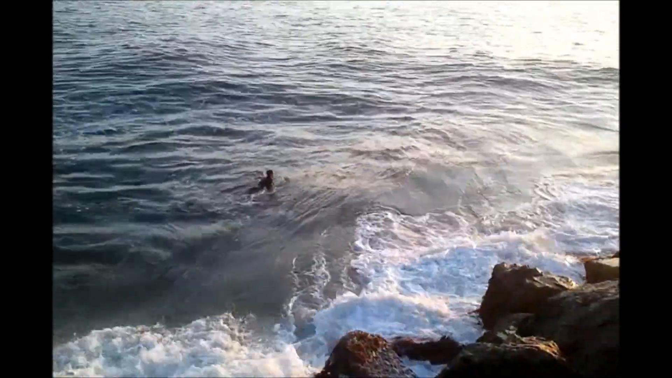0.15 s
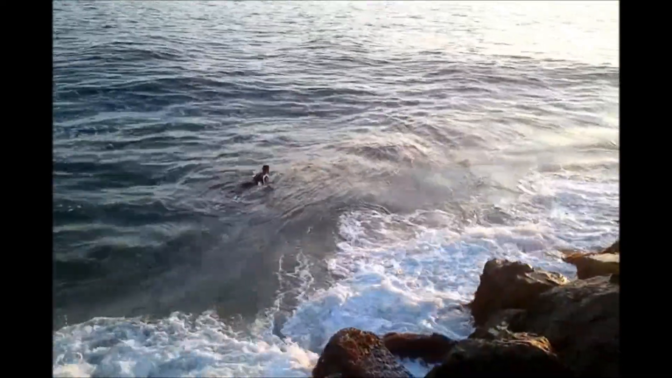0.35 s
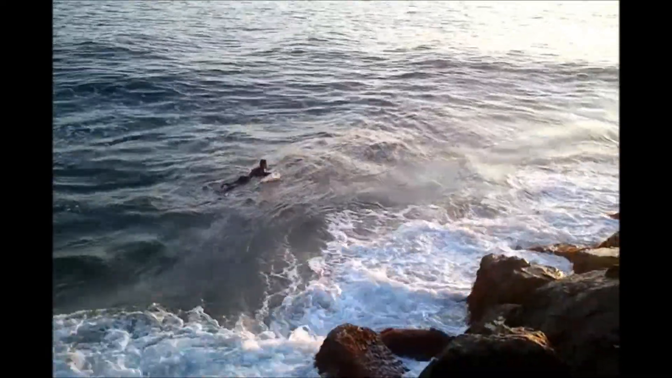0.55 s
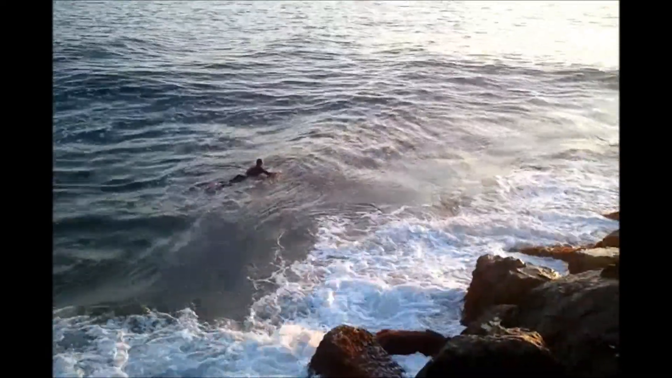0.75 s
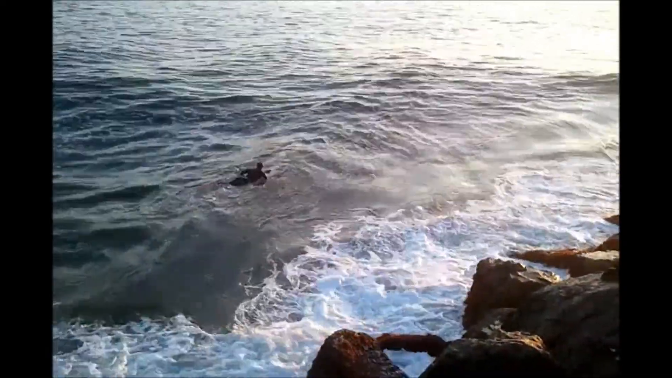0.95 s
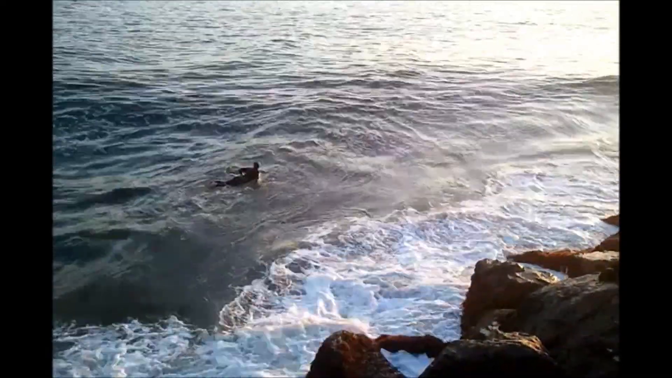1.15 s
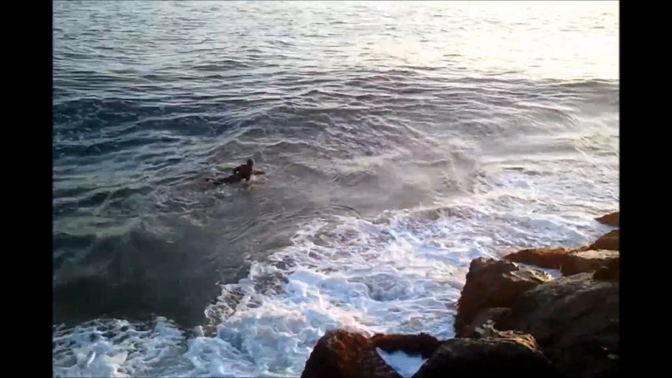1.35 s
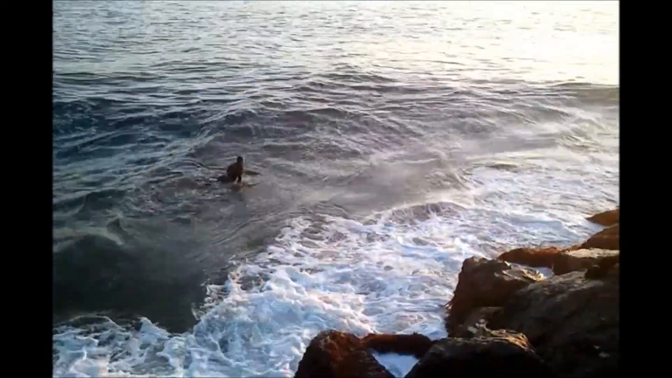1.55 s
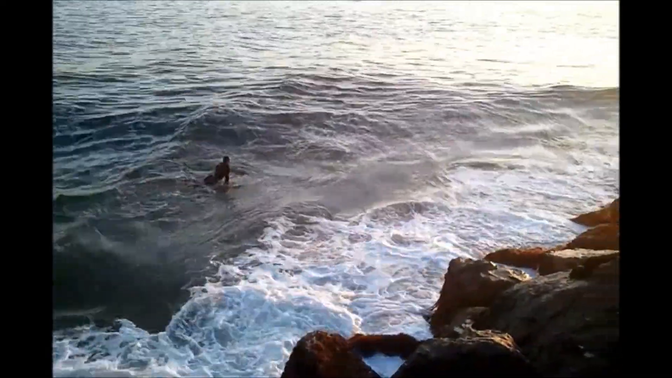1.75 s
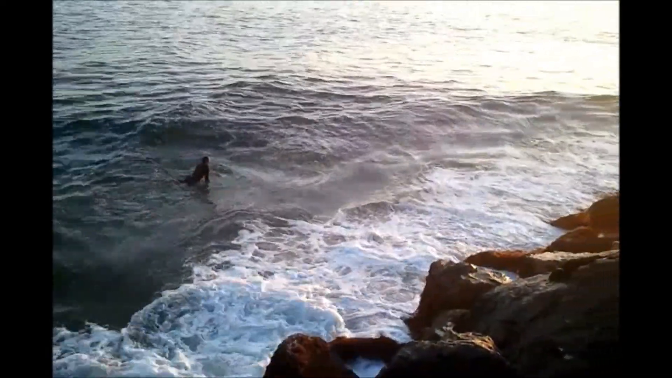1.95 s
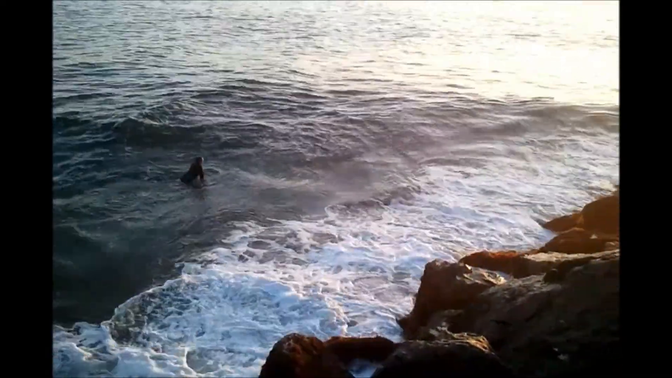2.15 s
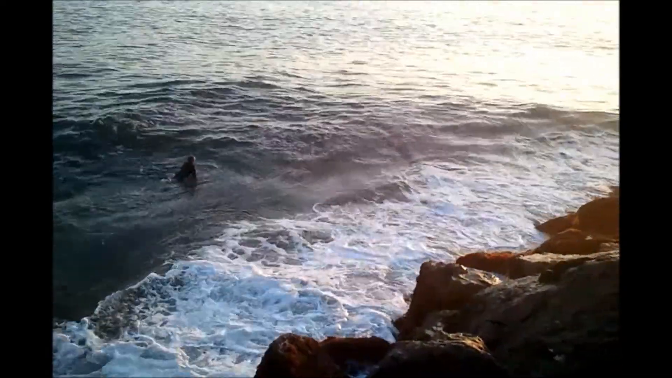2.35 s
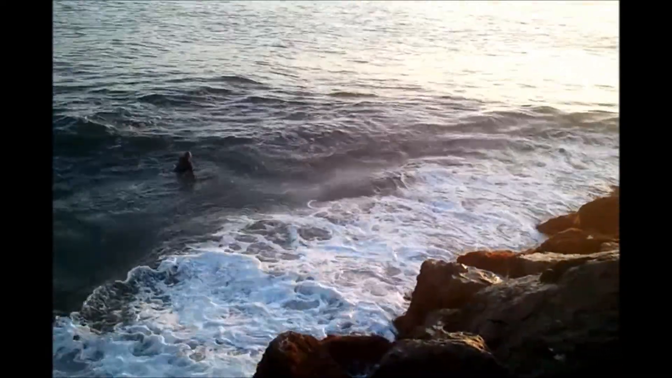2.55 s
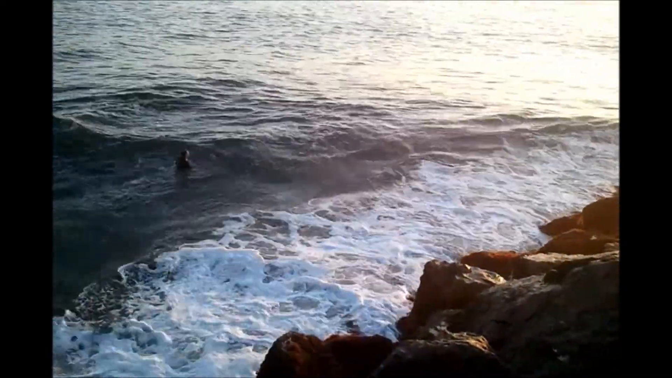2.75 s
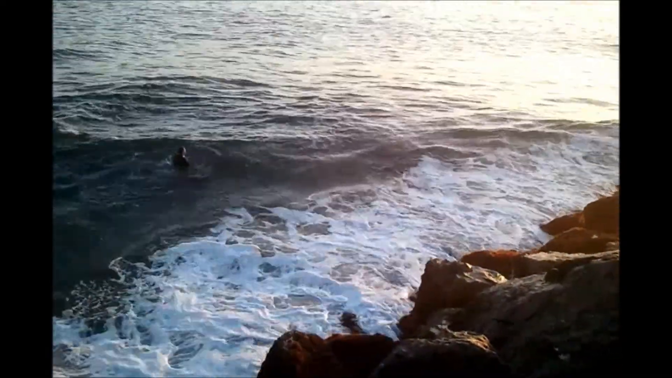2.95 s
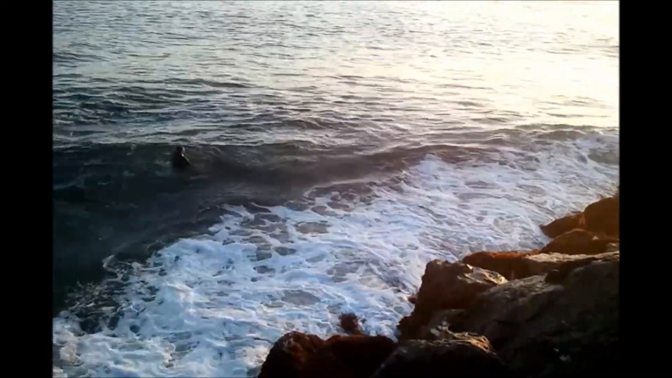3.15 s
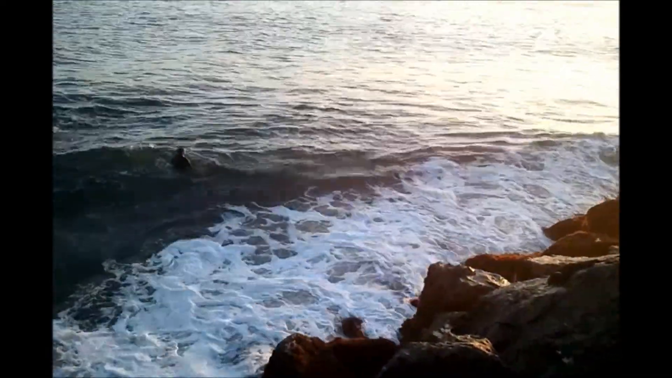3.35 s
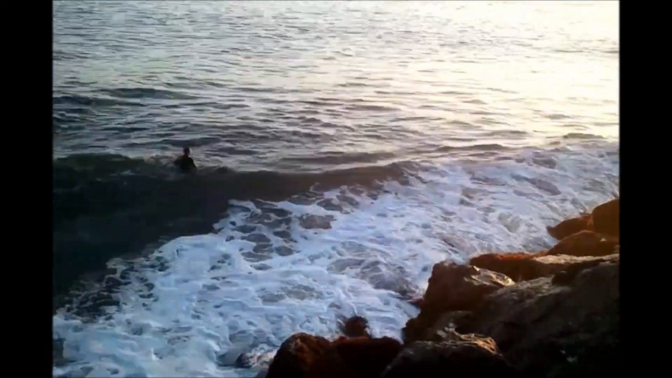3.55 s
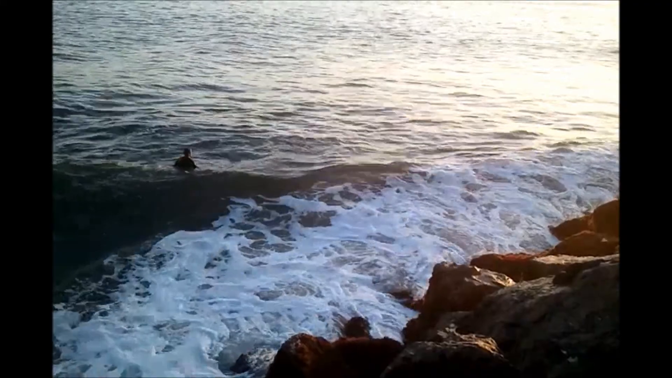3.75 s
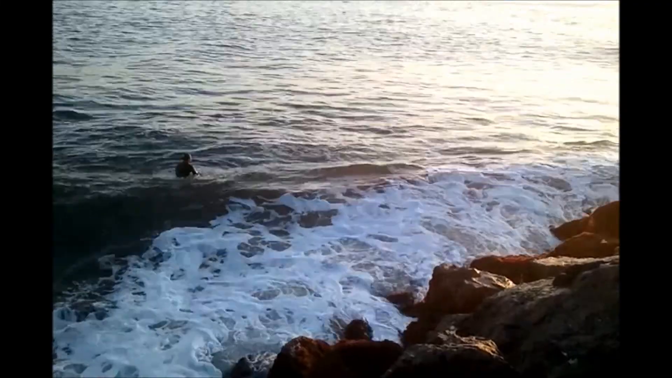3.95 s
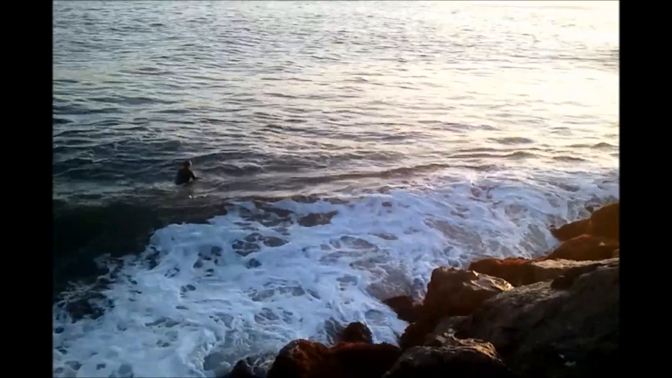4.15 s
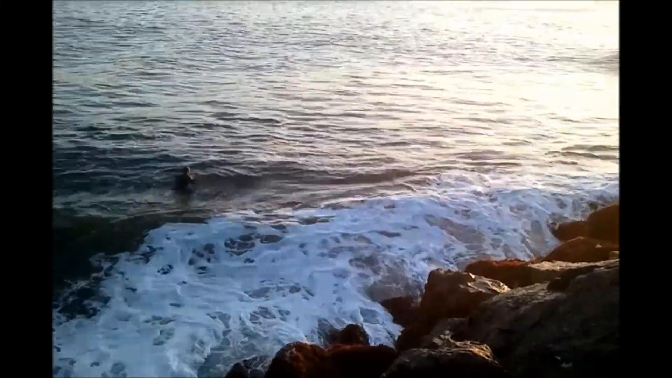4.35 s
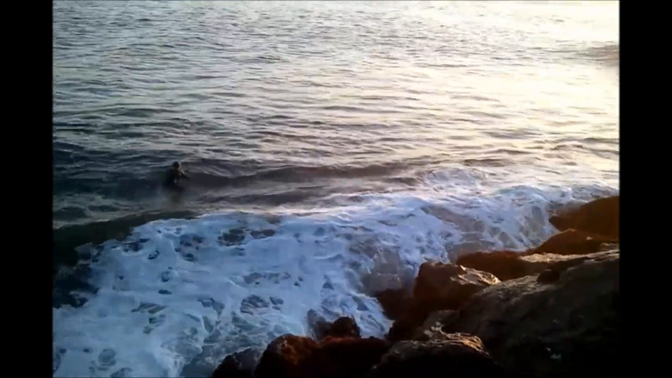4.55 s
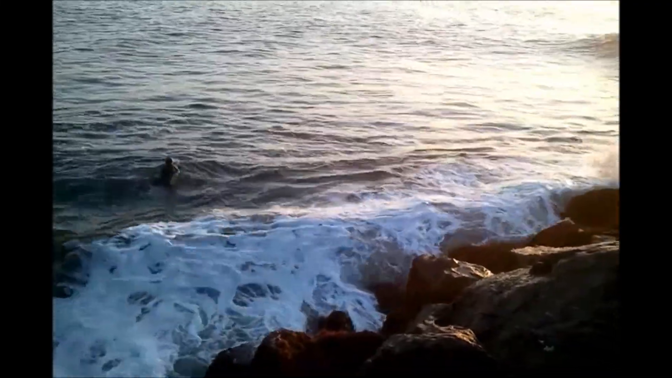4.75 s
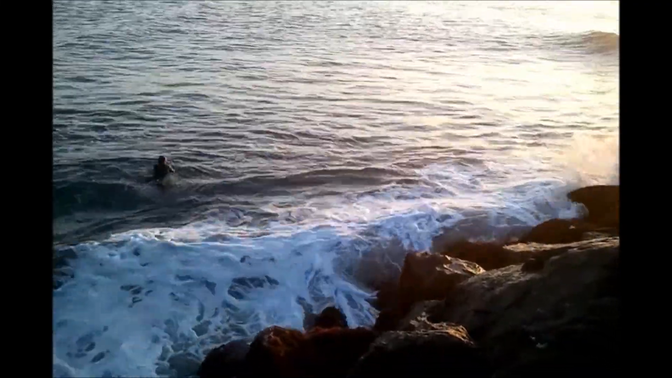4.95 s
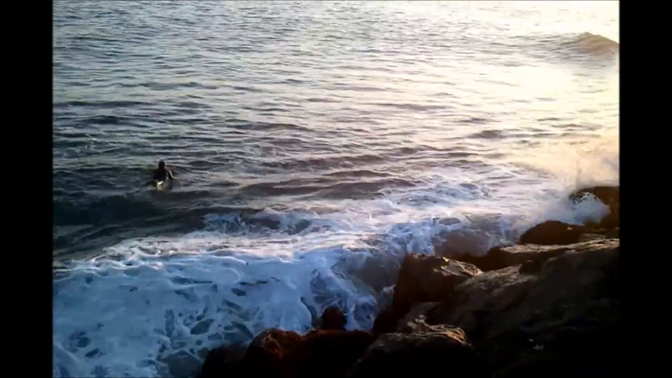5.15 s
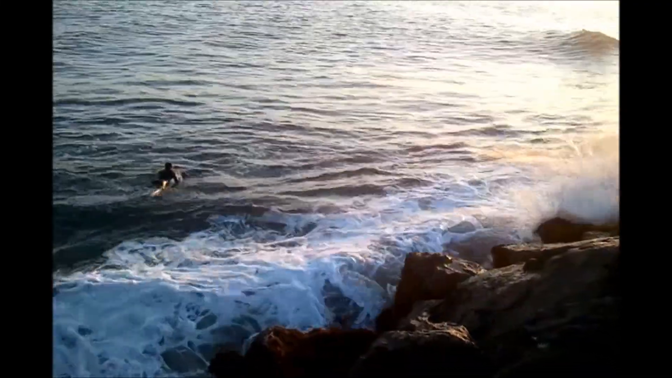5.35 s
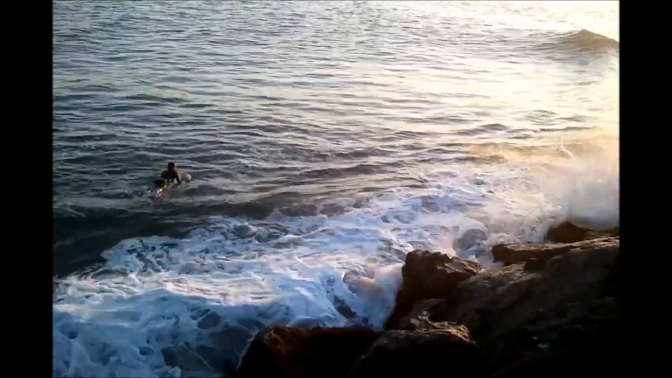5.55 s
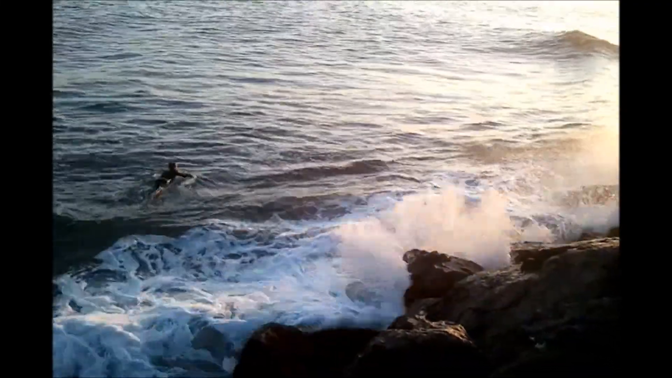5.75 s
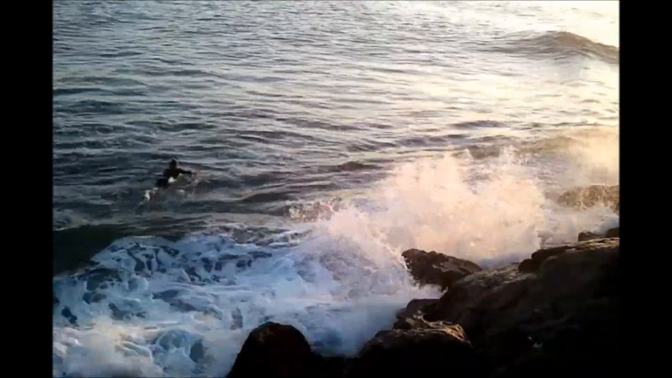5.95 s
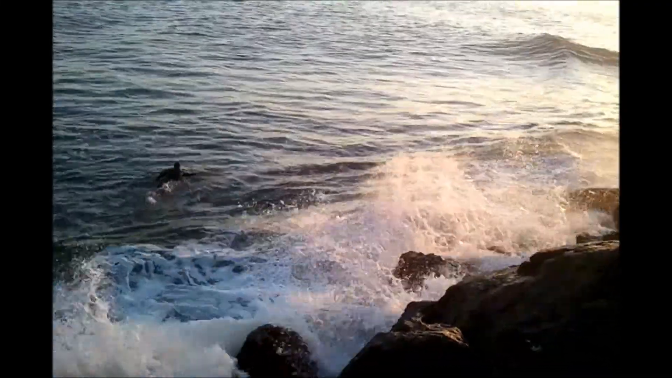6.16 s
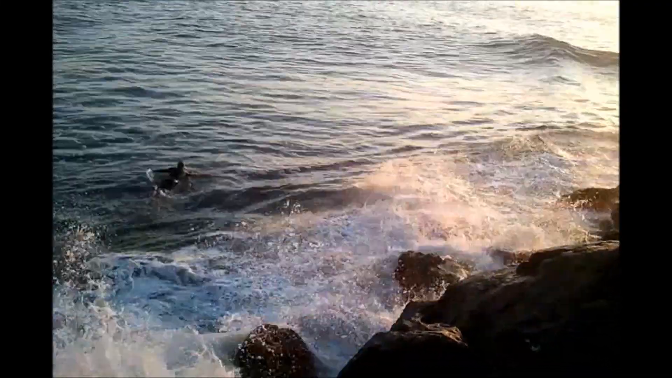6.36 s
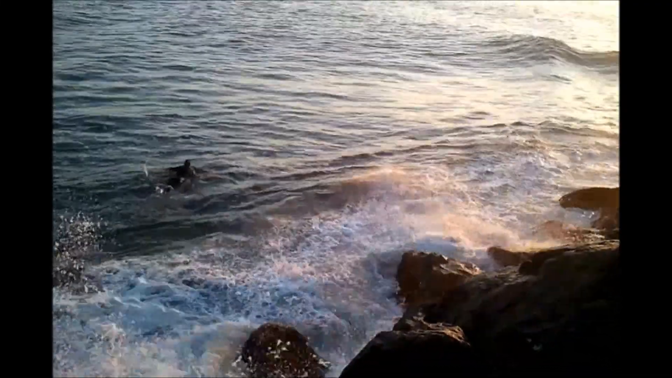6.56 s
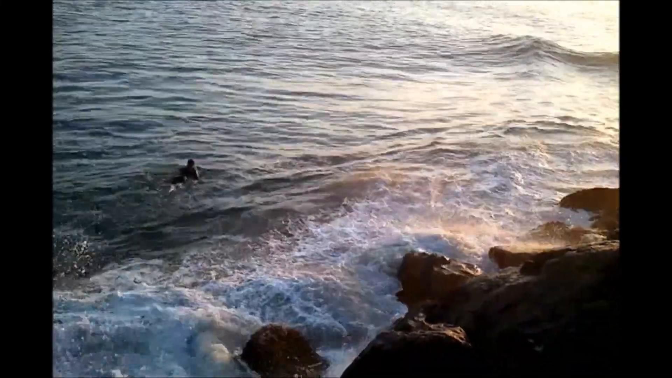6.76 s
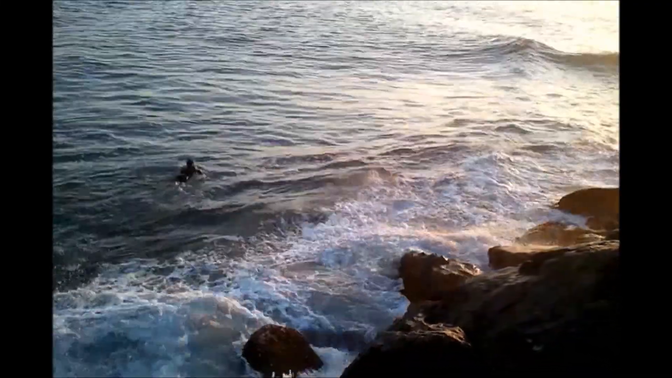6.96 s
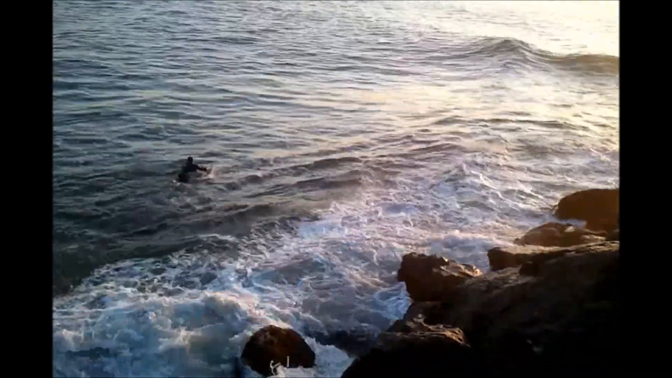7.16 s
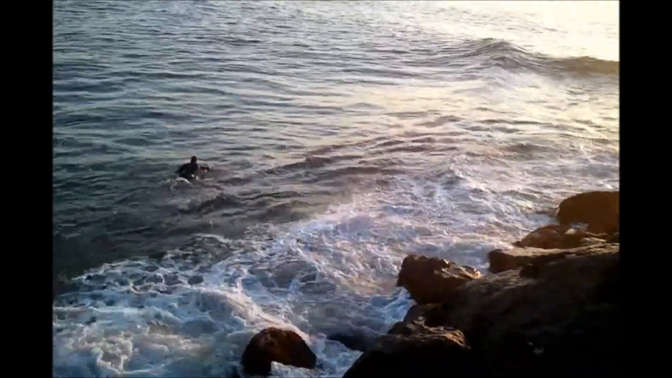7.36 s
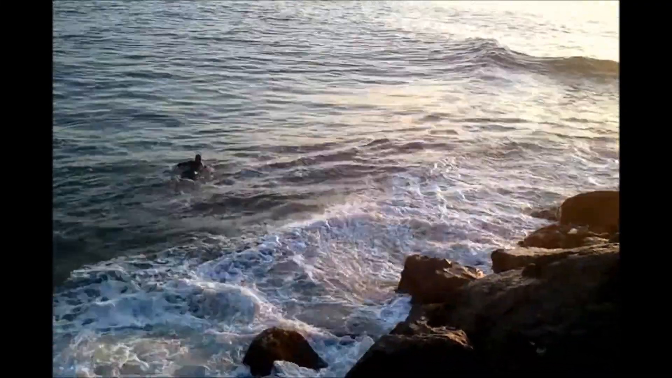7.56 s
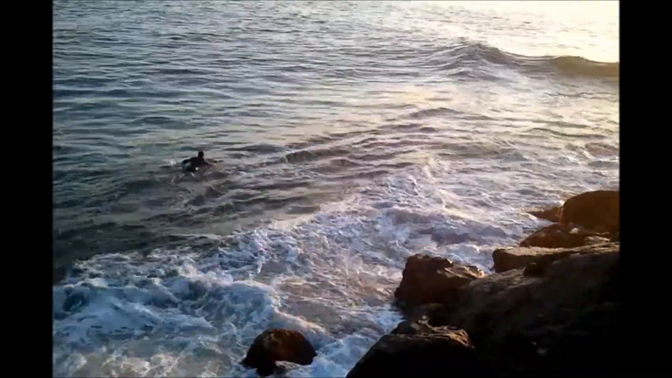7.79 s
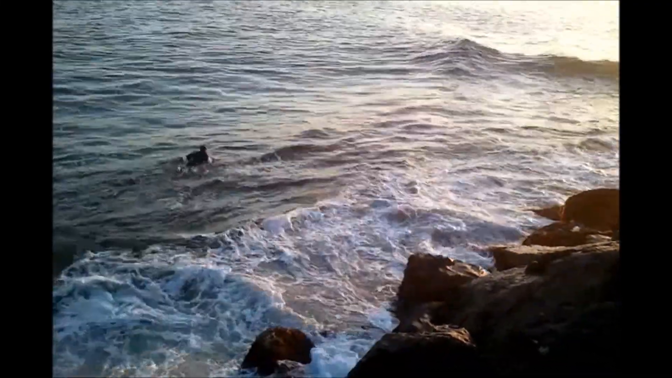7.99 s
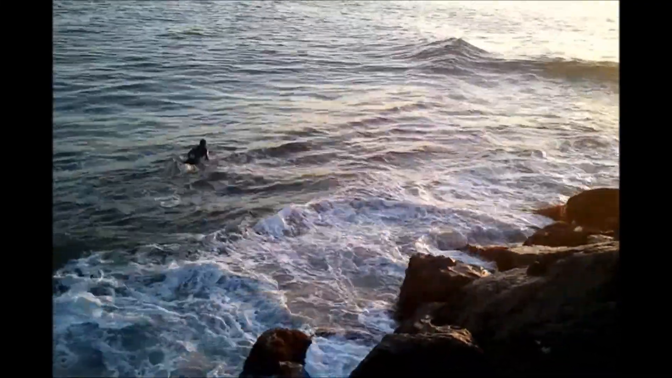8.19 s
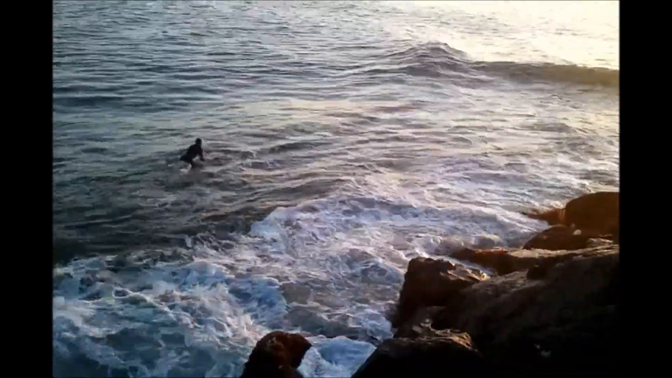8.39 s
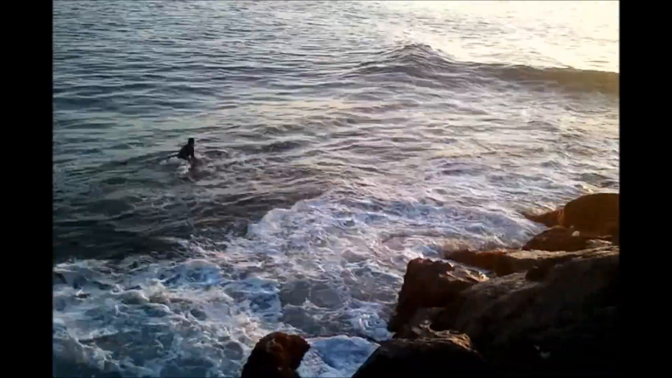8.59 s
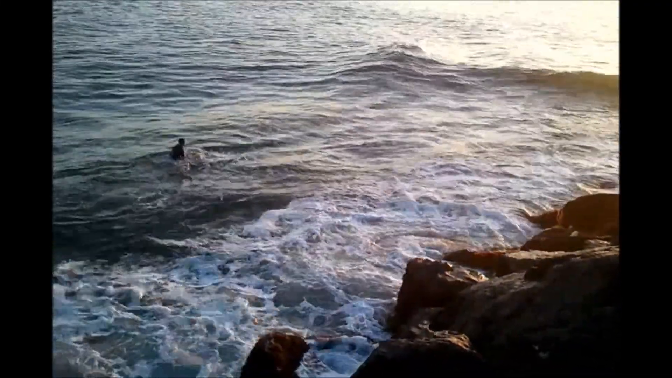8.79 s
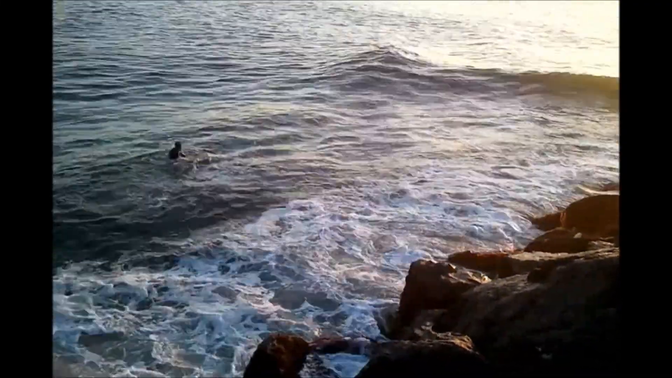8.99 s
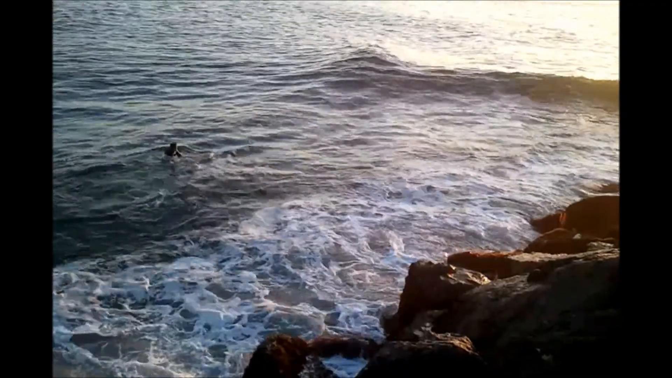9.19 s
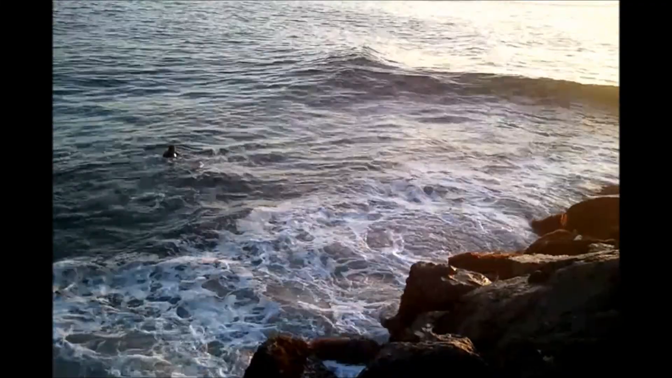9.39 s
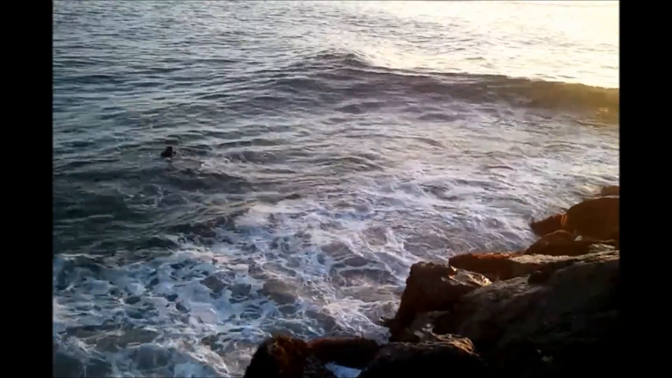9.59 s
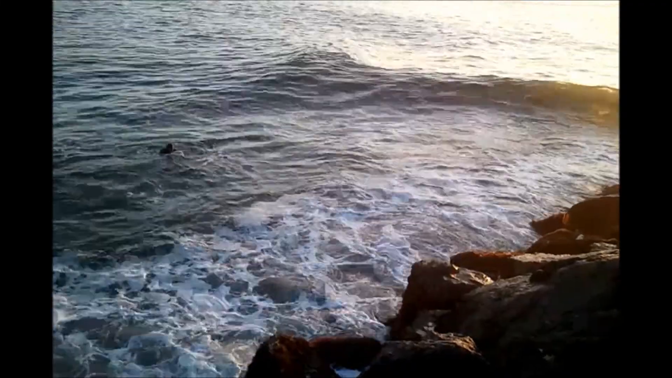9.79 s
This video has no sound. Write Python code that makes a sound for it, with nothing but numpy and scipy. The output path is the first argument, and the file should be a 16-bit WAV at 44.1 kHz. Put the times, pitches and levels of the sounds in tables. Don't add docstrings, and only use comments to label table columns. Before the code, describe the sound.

Foamy surf drains over rocks, dwindles to a quiet lull, then a swell breaks with a bright roar and recedes among droplet pops.

```python
import sys
import numpy as np
from scipy import signal
from scipy.fft import rfft, irfft, next_fast_len
from scipy.io import wavfile
from scipy.ndimage import uniform_filter1d

SR = 44100
rng = np.random.default_rng(int(sys.argv[2]) if len(sys.argv) > 2 else 0)


def amplitude_ratio(level_db):
    exponent = np.asarray(level_db, float) / 20
    return 10 ** exponent


def to_wav(s):
    ch = np.atleast_2d(s).T
    pcm = np.round(np.clip(ch, -1, 1) * 32767)
    wavfile.write(sys.argv[1], SR, pcm.astype(np.int16))


N = 433503


def evened(x):
    return x / np.sqrt(np.mean(x ** 2) + 1e-20)


def at(points, t):
    return np.interp(t, *np.transpose(points))


def read(points, hz):
    f, value = np.transpose(points)
    return np.interp(np.log(hz + 1), np.log(f + 1), value)


def add(mix, s, sound):
    part = mix[round(s * SR) - len(sound) // 2:][:len(sound)]
    part += sound[:len(part)]


def blip(hz, cycles, glide):
    u = np.linspace(-1, 1, 2 * int(cycles * SR / hz) + 1)
    return np.exp(-8.0 * u ** 2) * np.cos(2 * np.pi * cycles * (u + glide * u ** 2) - .6)


def random_hits(count, per_count, spread_db):
    where, size, sign = rng.random((3, count))
    sizes = amplitude_ratio(spread_db * np.minimum(-np.log(size + 1e-9), 4)) * np.sign(sign - .5)
    sizes *= np.arange(count) < per_count
    return np.bincount((where * N).astype(int), sizes, N)


def bubbles(per_cycle, spread_db, cycles):
    out = np.zeros(N)
    for hz in np.geomspace(80, 8000, num=20):
        count = int(hz * N / SR)
        bursts = random_hits(count, per_cycle * count, spread_db)
        out += evened(signal.oaconvolve(bursts, blip(hz, cycles, .15), "same"))
    spectrum = rfft(out, next_fast_len(N))
    local_power = uniform_filter1d(abs(spectrum) ** 2, size=600)
    return evened(irfft(spectrum / np.sqrt(local_power + 1e-9))[:N])


def spatter(per_s, spread_db):
    t = np.arange(200) / SR
    clump = rng.standard_normal(len(t)) * np.exp(-t / 0.0005)
    clicks = signal.oaconvolve(random_hits(20000, per_s * N / SR, spread_db), clump)[:N]
    return evened(signal.sosfilt(signal.butter(2, 1200, "high", fs=SR, output="sos"), clicks))


# (f/Hz, density/dB per Hz)
COLOUR = [(20, -30.5), (40, -21), (65, -12), (120, -4), (250, 0), (390, -2.5), (560, -6), (830, -4.5),
          (1100, -6), (1900, -2.5), (2900, -8.5), (4300, -16.5), (6200, -14), (7500, -16)]


def coloured(x):
    size = next_fast_len(N)
    all_hz = np.fft.rfftfreq(size, 1 / SR)
    colour = amplitude_ratio(read(COLOUR, all_hz))
    roar_band = (all_hz > 1300) & (all_hz < 3000)
    colour /= np.sqrt(np.sum(colour[roar_band] ** 2) / len(colour))
    return irfft(rfft(x, size) * colour, size)[:N]


# (t/s, level/dB)
SURF = [(0, -21.5), (.35, -21), (.71, -20.5), (1.23, -26), (1.67, -26.5), (2.55, -29.5), (2.96, -31.5),
        (3.7, -34), (5.01, -32), (5.5, -28.5), (6.0, -24), (6.45, -21.5), (6.62, -17), (7.1, -18),
        (7.75, -24), (8.46, -26.5), (9.31, -29.5), (9.83, -31)]


def surf_db(t):
    return at(SURF, t)


# (peak t/s, build/s, collapse/s,
# level/dB)
GUSHES = [(.33, 0.39, .025, 4.5), (.66, .31, .05, 3.5), (1.64, 0.36, 0.033, 3), (3.26, 0.33, .1, 3),
          (3.5, 0.4, 0.23, 5.5), (3.91, 0.22, .08, 2.5), (4.3, 0.13, .05, 1.5), (4.79, .4, .2, 1.5),
          (5.2, 0.14, 0.086, 2), (5.64, 0.072, 0.23, 0.7), (6.05, 0.044, .35, 1.5), (6.79, 0.086, .25, 0.4),
          (7.66, .3, .09, 3), (7.8, .05, .25, 4), (8.1, 0.022, .06, -2.5), (5.0, .1, .05, -0.5),
          (7.2, 0.35, .2, 1), (8.68, 0.19, .6, 3)]


def gushes_db(t):
    total_db = 0
    for s, build, collapse, db in GUSHES:
        ramp = np.minimum(1 + (t - s) / build, 1 - (t - s) / collapse)
        total_db = total_db + db * np.clip(ramp, 0, 1)
    return total_db


# (t/s, state, below 0 foam draining, above 0 swell arriving)
TIDE = [(0, -0.59), (.7, -0.82), (1, -0.57), (1.8, -0.3), (2.6, -0.012), (3.1, 0.089), (3.7, .2),
        (4.2, 1.2), (4.6, 0.99), (5.2, 1.4), (5.7, 1.2), (6.3, 0.77), (6.7, 0.3), (7.5, -0.56), (8, -0.13),
        (8.6, -.2), (9.2, -0.34), (9.83, 0.32)]


def tide_state(t):
    return at(TIDE, t)


# (f/Hz, level/dB)
ARRIVING = [(60, 3), (250, .5), (480, -1.5), (900, 1), (1550, -1), (2100, 0.2), (3000, 2), (4300, -2),
            (6000, 1.4), (7800, -0.5)]


def arriving_db(hz, t):
    return np.outer(read(ARRIVING, hz), tide_state(t))


# (t/s, level/dB)
SPRAY = [(0, 0), (.3, -0.5), (.85, -3.5), (1.4, -4), (2.5, -4), (2.8, -1.5), (3.3, -3), (3.9, 1.5),
         (4.5, 2.5), (5.04, 5.5), (5.4, 3), (6.2, 0.5), (7.0, 1), (7.56, 2), (7.84, -2.5), (8.3, 2),
         (8.5, -5), (9.83, 1)]


def spray_db(t):
    return at(SPRAY, t)


BREAK_S = 6


def fizz_db(t):
    ebb = np.clip((t - BREAK_S) / .3 + 1, 0, 1)
    return 0.1 + 0.6 * spray_db(t) - 0.17 * tide_state(t) - 0.9 * ebb


def rumble_db(t):
    lead_s, ebb_db_per_s = .05, 0.56
    level_db = -26.5 + 0.66 * (surf_db(t + lead_s) + 25) + 0.27 * gushes_db(t) - 0.05 * tide_state(t)
    return level_db - ebb_db_per_s * np.maximum(t - BREAK_S, 0)


LAYER_HZ = [330, 800, 1500, 2600, 3700, 5600]


def layers_db(hz, t, roar_db):
    wash_db = -.2 * (roar_db + 22.5)
    layers = np.array([rumble_db(t) - roar_db + 3.5, wash_db, 0 * t, 0 * t, spray_db(t), fizz_db(t)])
    shares = np.array([read(list(zip(LAYER_HZ, row)), hz) for row in np.eye(len(LAYER_HZ))])
    return shares.T @ layers


# (f/Hz, level/dB)
BACKWASH = [(2600, 0), (3700, 2), (4800, -2), (6500, -0.5)]


def backwash_db(hz, t):
    start_s, rise_s = 9.4, .25
    return np.outer(read(BACKWASH, hz), np.clip((t - start_s) / rise_s, 0, 1))


def patches_db(frames, patchy_db=0.43, slosh_db=0.5, flicker_db=0.19):
    def smooth(x, over_time, over_pitch):
        return evened(uniform_filter1d(uniform_filter1d(x, size=over_time, axis=0), size=over_pitch, axis=1))

    small, wide, flicker = rng.standard_normal((3, frames, 100))
    patches = patchy_db * smooth(small, 16, 5) + slosh_db * smooth(wide, 18, 56)
    return (patches + flicker_db * smooth(flicker, 4, 60)).T


def whitewater(foam=0.24, spatter_db=-9):
    x = np.sqrt(foam) * bubbles(.25, 2.7, 2.05) + np.sqrt(1 - foam) * rng.standard_normal(N)
    x = evened(x + amplitude_ratio(spatter_db) * spatter(600, 4.2))
    hz, t, z = signal.stft(coloured(x), SR, nperseg=512, noverlap=384)
    roar_db = surf_db(t) + gushes_db(t)
    field_db = roar_db + layers_db(hz, t, roar_db) + arriving_db(hz, t) + backwash_db(hz, t)
    field_db[:100] += patches_db(len(t))
    return signal.istft(z * amplitude_ratio(field_db), SR, nperseg=512, noverlap=384)[1][:N]


def knocks(table, shape, echo_s, echo_db):
    out = np.zeros(N)
    for s, db, hz, cycles in table:
        sound = amplitude_ratio(db) * shape(hz, cycles)
        add(out, s, sound)
        add(out, s + echo_s, amplitude_ratio(echo_db) * sound)
    return out


def pops(table):
    return knocks(table, lambda hz, cycles: blip(hz, cycles, .03), .002, -13)


# (t/s, peak level/dB, f/Hz)
TICKS = [(.0838, -12, 4514), (1.3339, -17, 4514), (1.6026, -18, 4514), (4.8046, -17, 7000),
         (7.3325, -8.5, 5621), (7.5154, -9, 4045), (7.5353, -7, 4045), (7.5706, -11, 6273),
         (7.6492, -12, 4045), (7.8523, -12.5, 5621), (8.0806, -14, 4700), (8.1258, -14, 5037),
         (8.1349, -14, 7000), (8.1699, -17.5, 7000), (8.2457, -11.5, 6273), (8.267, -16, 7000),
         (8.2985, -15, 5621), (8.3087, -17.5, 5621), (8.4046, -18.5, 7000), (8.505, -9.5, 7000),
         (8.5051, -12, 4900), (8.5994, -20.5, 7000), (8.703, -16, 6273), (8.7147, -15, 5037),
         (8.7956, -20.5, 7000), (9.5555, -17, 4514), (9.7529, -20.5, 7000), (9.7532, -20, 3500),
         (9.8141, -20, 5037)]


def ticks():
    cycles = 3.4
    return pops([(s, db, hz, cycles) for s, db, hz in TICKS])


def thud(hz, cycles):
    u = np.arange(int(3 * cycles * SR / hz)) * hz / SR
    swing = np.sin(2 * np.pi * (0.813 * u + 0.3 * (1 - np.exp(-u / .5))))
    sound = 2.15 * (1 - np.exp(-(u / 0.29) ** 2)) * np.exp(-1.8 * u / cycles) * swing
    bell = np.hanning(len(u))
    sound = sound - sound.sum() * bell / bell.sum()
    padding = np.zeros(len(u) - int(.9 * SR / hz))
    return np.r_[padding, sound]


# (t/s, peak level/dB, f/Hz, length/cycles)
THUMPS = [(1.3979, -16.5, 230, 4), (1.4114, -9.5, 410, 1.8), (1.4282, -15, 210, 1.5),
          (1.4407, -4, 235, .75), (1.7056, -11.5, 235, 1.3), (9.6528, -21.5, 178, 2.1),
          (2.7635, 3, 284, 0.59), (2.7712, -11, 320, 1.3), (2.7812, -16, 260, 2.6), (2.8336, -8, 235, .8),
          (2.8418, -17, 197, 1.2), (3.031, -21.5, 199, 4.2), (3.0393, -22, 131, 1.2),
          (3.1076, -21, 139, 1.9), (4.2745, -18, 235, 1.2), (5.1339, -12, 175, 1.1),
          (5.4766, -18, 240, 1.6), (5.8546, -16, 170, 3.4), (5.7399, -10, 132, .94),
          (5.8268, -11.5, 154, 1.3), (5.8484, -7.5, 340, 1.1), (5.9352, -5, 186, .61),
          (6.0395, -16.5, 314, 3.3), (6.5943, -9.5, 314, 2), (6.6015, -14, 357, 2.8),
          (6.6602, -15, 186, 2.2), (8.6546, -17.5, 403, 1.9), (9.3187, -12.5, 233, 1),
          (9.379, -22, 170, 2.1), (9.3913, -19.5, 170, 2)]


def thumps():
    return knocks(THUMPS, thud, 0.0092, -18.5)


# (t/s, peak level/dB, f/Hz, length/cycles)
DROPS = [(2.6579, -16, 2338, 1.5), (3.4682, -13.5, 2911, 1.5), (3.5166, -10, 1877, 2.2),
         (3.6089, -16, 2609, 5.3), (4.313, -16, 2338, 1.5), (4.4824, -16, 2095, 2.5),
         (5.7056, -14, 2338, 7.4), (6.5963, -9, 3625, 1.5), (6.7751, -6.5, 972, 1.7),
         (7.4043, -7, 2911, 4.6), (7.6542, -6, 2911, 1.8), (7.8069, -8.5, 3625, 1.4),
         (8.0797, -1.5, 1877, 2.5), (8.1306, -13.5, 2720, 6), (8.2099, -12, 2400, 3.8),
         (8.2868, 1, 1877, 3), (8.287, -11.5, 3400, 2.5), (8.291, -11, 1800, 2.5),
         (8.3274, -4.5, 2050, 3.1), (8.8074, -14.5, 2609, 5.7), (9.3663, -16, 1351, 2.5),
         (9.556, -12, 2300, 2), (9.6104, -8.5, 990, 2.8), (9.6144, -15.5, 2900, 4.3),
         (9.7535, -10, 1900, 2.3)]


def drops():
    return pops(DROPS)


def scene():
    return np.tile(whitewater() + ticks() + thumps() + drops(), (2, 1))


HISS_EDGES_HZ = [4170, 4620, 5180, 5700, 6280, 6850, 7580, 8290]
# (t/s, first band number, last band number)
HISS_PATCHES = [(.0695, 6, 6), (.2088, 5, 6), (.5106, 6, 6), (.7893, 2, 3), (1.2769, 1, 2), (1.2769, 5, 6),
                (1.6716, 0, 1), (1.6716, 6, 6), (1.6949, 5, 6), (1.9271, 5, 6), (2.6469, 4, 5),
                (3.3667, 1, 3), (3.9472, 6, 6), (3.9704, 4, 5), (4.0168, 3, 4), (4.0168, 6, 6),
                (4.667, 4, 5), (6.6175, 2, 3), (6.6175, 6, 6), (6.7568, 4, 5), (6.8032, 2, 3),
                (6.9193, 1, 2), (6.9658, 5, 6), (7.1283, 1, 3), (7.2212, 6, 6), (8.9859, 5, 6)]


def hiss_patches(sound):
    hiss_db = -5.5
    hz = np.fft.rfftfreq(2048, 1 / SR)
    fade = signal.windows.kaiser_bessel_derived(2048, 4 * np.pi)
    hiss = np.zeros((2, N))
    for s, first, last in HISS_PATCHES:
        lo, hi = HISS_EDGES_HZ[first], HISS_EDGES_HZ[last + 1]
        band, top_band = (hz > lo) & (hz < hi), (hz > 7900) & (hz < hi)
        there = irfft(rfft(sound[0, round(s * SR) - 1024:][:2048]) * band)
        mid, side = irfft(rfft(rng.standard_normal((2, 2048))) * [top_band, band])
        gain = amplitude_ratio(hiss_db) * np.std(there) * fade / np.std(side)
        add(hiss[0], s, gain * (mid + side))
        add(hiss[1], s, gain * (mid - side))
    return hiss


def top_cut(x):
    return signal.sosfilt(signal.butter(12, 8830, fs=SR, output="sos"), x)


def record(dry):
    size, top_hz = next_fast_len(N), 8260
    all_hz = np.fft.rfftfreq(size, 1 / SR)
    edge = amplitude_ratio(-28 * np.clip((all_hz - 7500) / 750, 0, 2) ** 1.4) * (all_hz < top_hz)
    overloaded = 1.628 * np.tanh(dry / 1.583)
    out = irfft(rfft(overloaded, size) * edge, size)[:, :N]
    ends = signal.windows.tukey(N, 60 / N)
    return top_cut(ends * out + hiss_patches(out))


dry = scene()
out = record(dry)
to_wav(out)
```